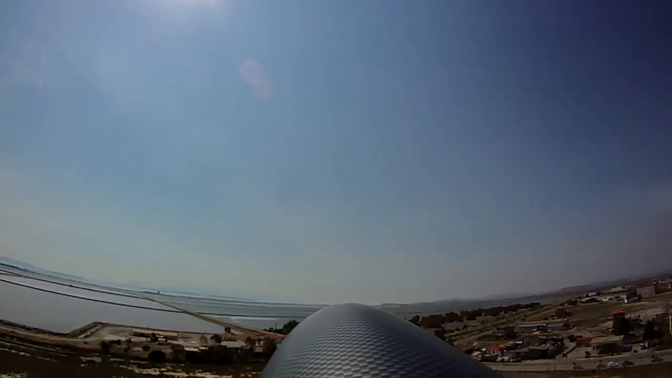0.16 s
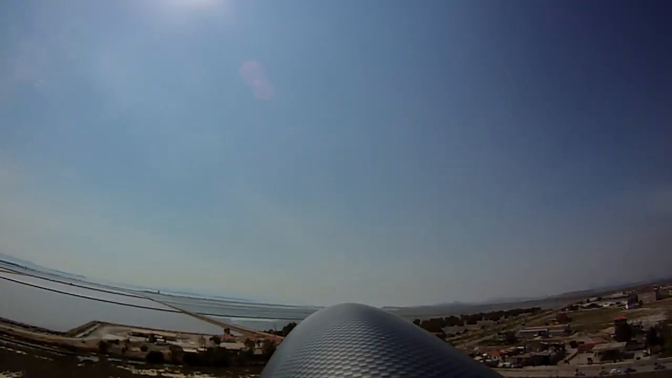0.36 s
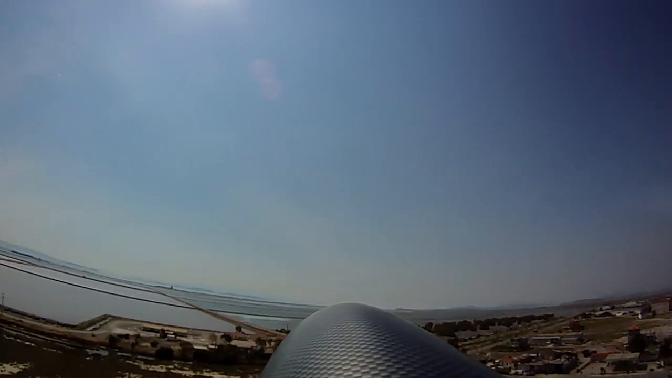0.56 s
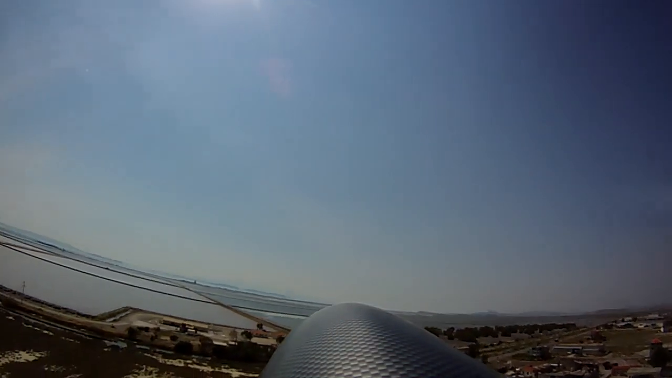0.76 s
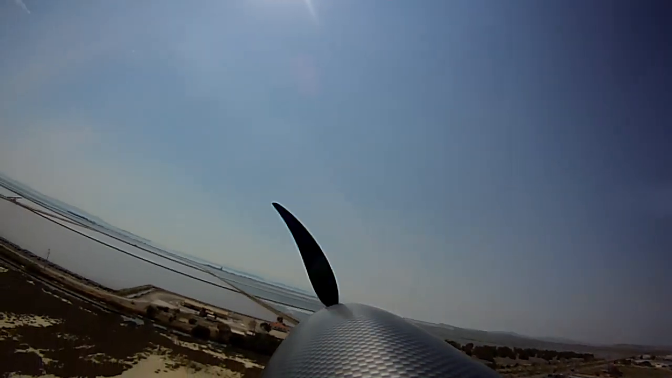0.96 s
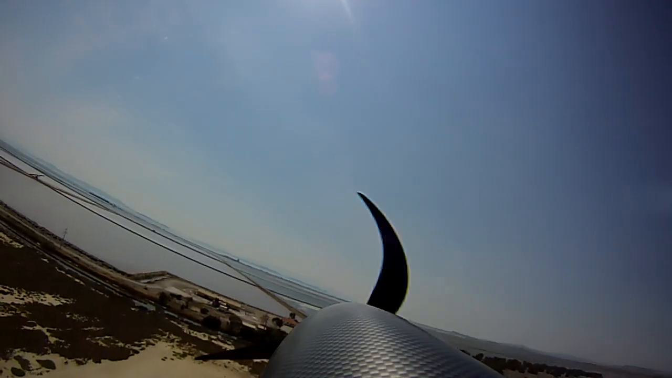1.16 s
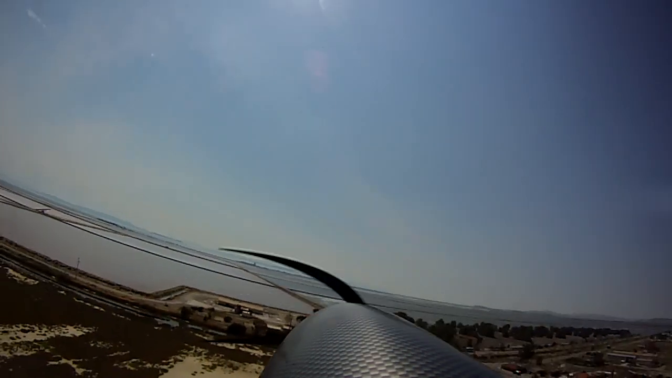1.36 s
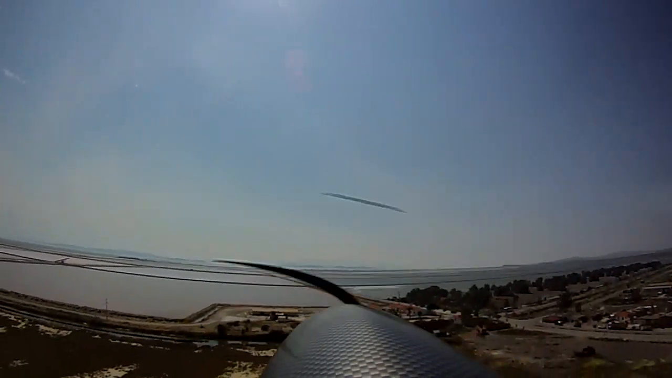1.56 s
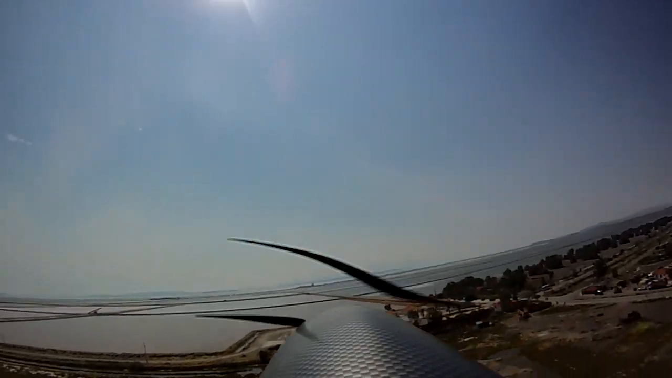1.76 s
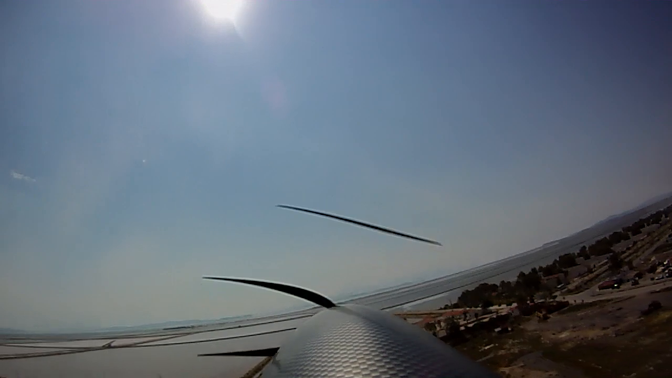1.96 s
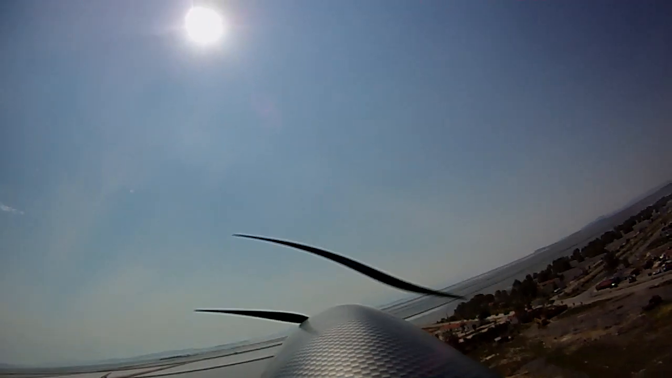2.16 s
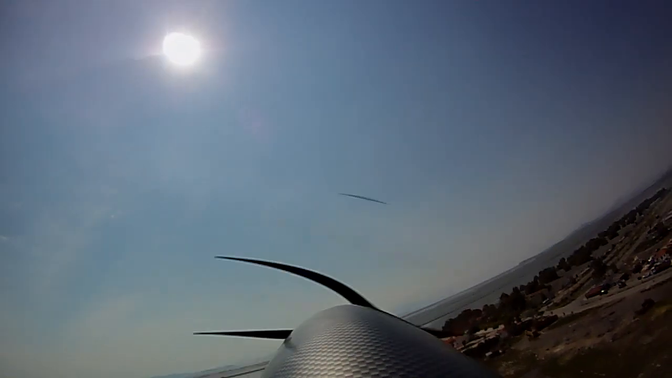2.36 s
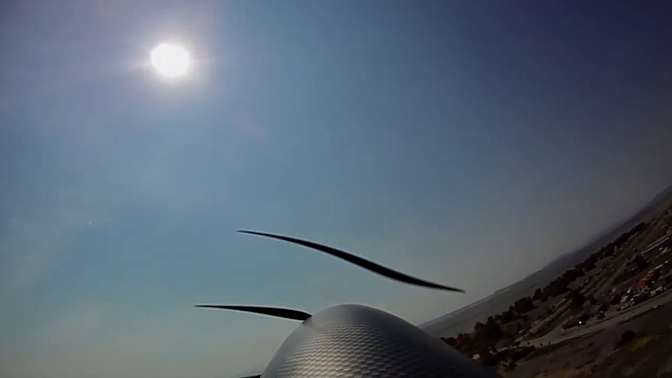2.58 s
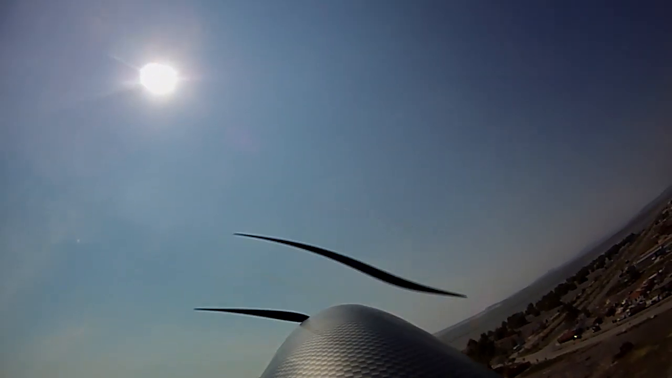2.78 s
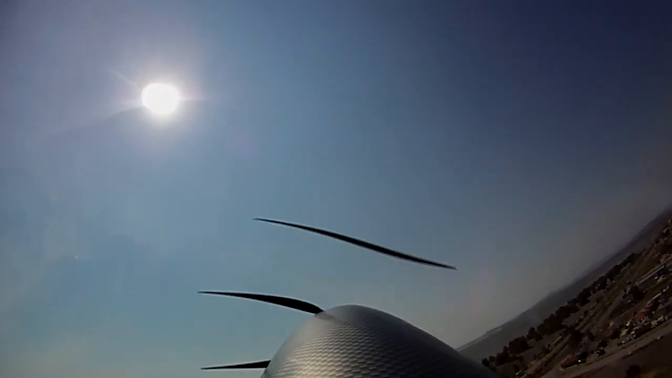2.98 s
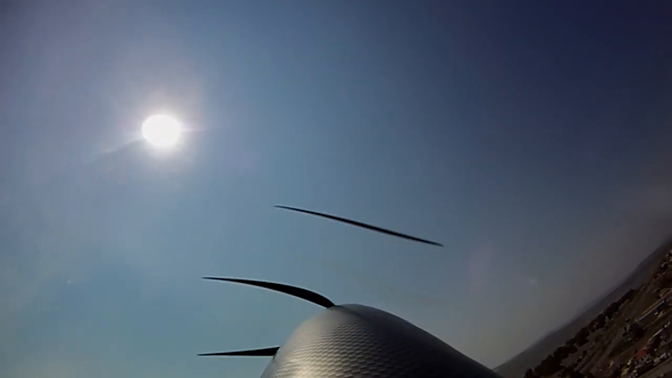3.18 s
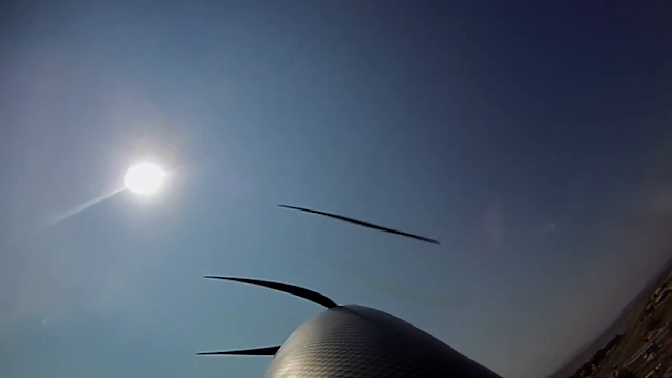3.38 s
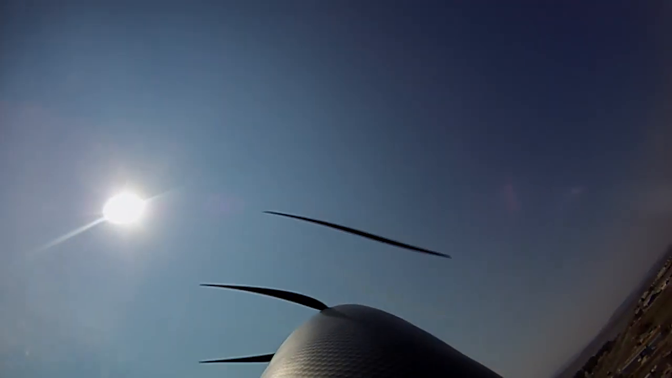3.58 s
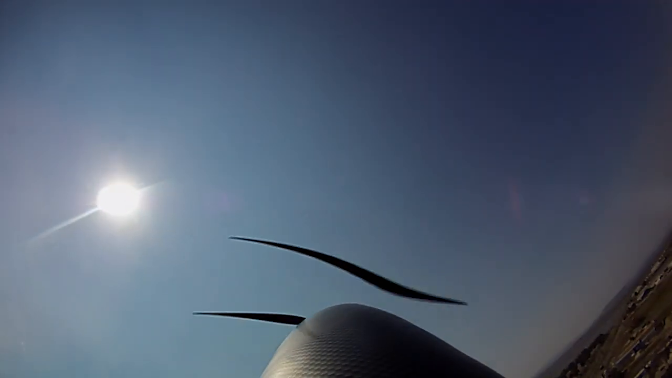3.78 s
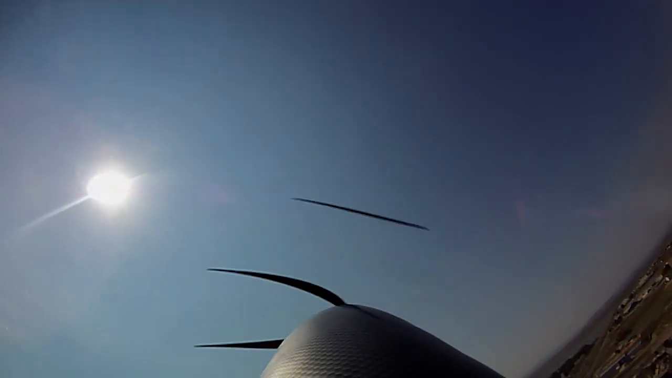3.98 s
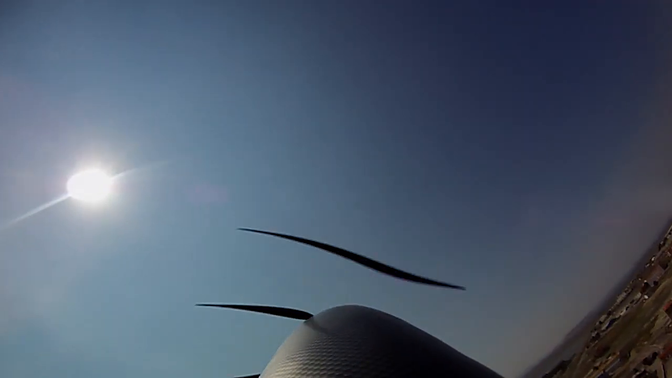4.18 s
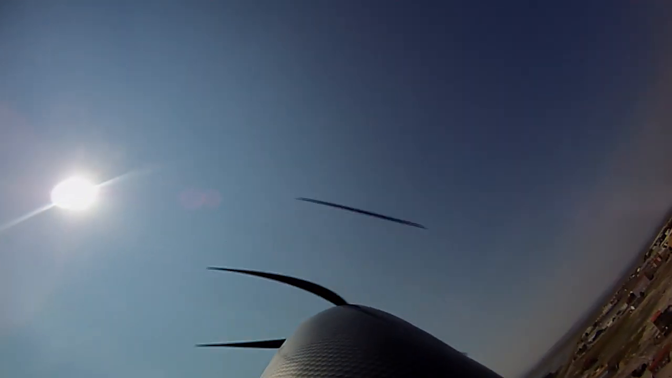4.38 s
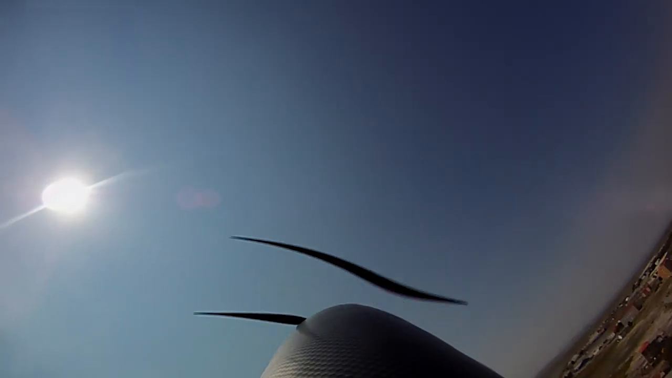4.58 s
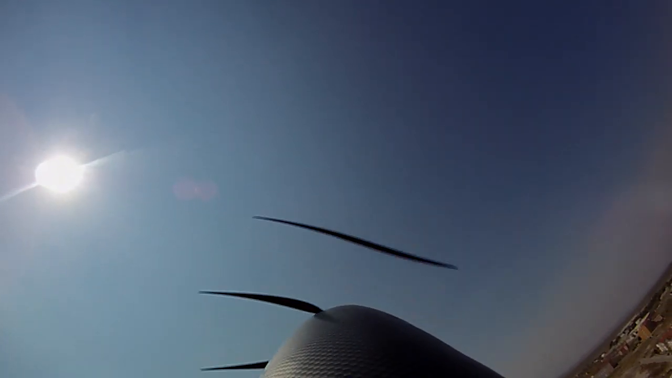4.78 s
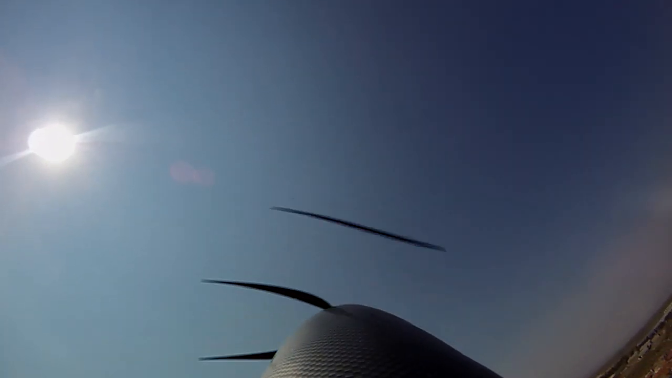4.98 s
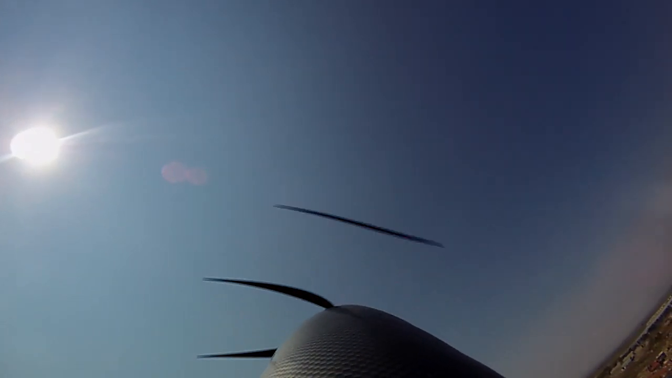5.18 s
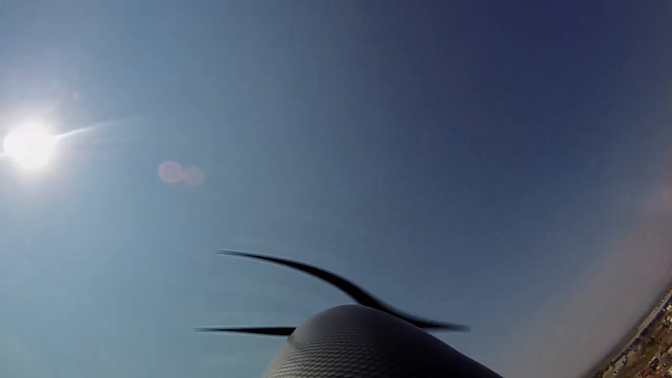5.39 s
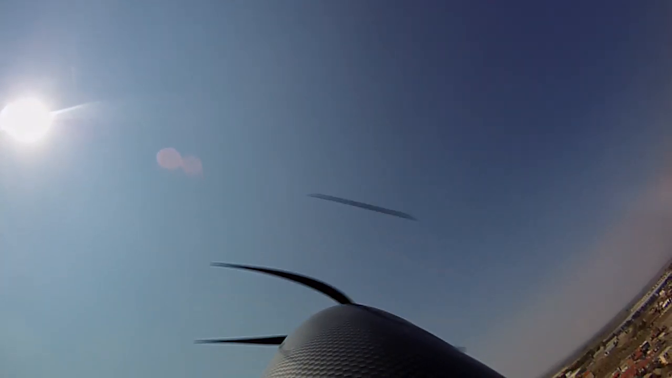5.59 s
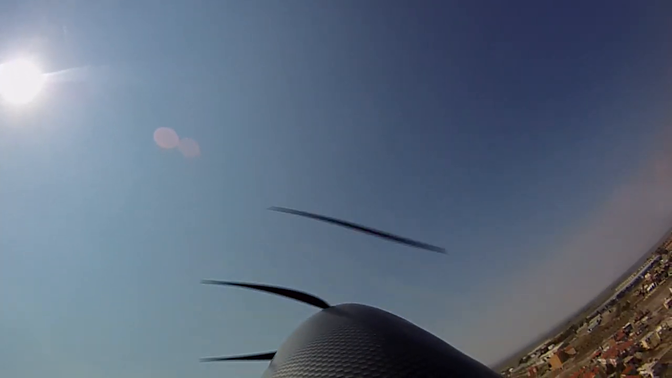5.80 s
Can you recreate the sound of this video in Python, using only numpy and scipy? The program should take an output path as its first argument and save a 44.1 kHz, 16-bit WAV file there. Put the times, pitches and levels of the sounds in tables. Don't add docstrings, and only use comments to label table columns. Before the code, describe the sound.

The microphone sits on a small model glider, right behind its folding propeller, high in open air. For the first second there is only quiet gliding: soft low buffeting, a thin hiss over the skin and a faint hollow hum that puffs early and again near 0.95 s. Tiny dry ticks appear from about 0.75 s, with a click and low knock at 1.0 s as the blades unfold. At 1.2 s a brushless motor starts, its whine sweeping rapidly upward and vanishing by about 1.6 s. Turbulent slipstream then swells abruptly, far louder, peaking near 1.85 s with hard, clipped slaps. It continues to 5.8 s as uneven, bassy pounding and rumble, with short dips, crackling bursts and airframe lurches, densest from 2 to 4 s. A faint, low, slightly wavering shaft drone lies beneath, and the recording ends still in the blast.

```python
import sys
import numpy as np
from scipy import signal
from scipy.fft import rfft, irfft, next_fast_len
from scipy.io import wavfile
from scipy.ndimage import uniform_filter1d

SR = 44100
rng = np.random.default_rng(int(sys.argv[2]) if len(sys.argv) > 2 else 0)


def volts(x):
    e = np.asarray(x, float) / 20
    return 10 ** e


def output_pcm(signal):
    pcm = np.clip(np.atleast_2d(signal).T, -1, 1) * 32767
    wavfile.write(sys.argv[1], SR, np.round(pcm).astype(np.int16))


N = 257544
T = np.arange(N) / SR

# time in seconds, pressure level in dB.
WASH_CURVE = [(1.39, -41), (1.49, -23), (1.68, -15.5), (1.86, -10.5), (1.98, -15), (2.15, -11.5),
              (2.55, -15.5), (2.75, -17.5), (2.96, -15), (3.21, -13), (3.44, -13), (3.58, -15.5),
              (3.83, -16.5), (3.9, -12), (4.1, -16.5), (4.93, -15.5), (5.05, -20), (5.84, -17.5)]
# time in seconds, peak in dB, length in ms.
AIR_SLAPS = [(1.6821, 1.5, 1.6), (1.7802, 1.8, 3.1), (1.8544, 6.3, 2.2), (2.0924, -2.5, 2.4),
             (2.1337, -0.0, 6.1), (2.2468, 0, 1.4), (2.352, 1, 1.26), (2.4449, -3, 2.3), (2.89, -2.5, 0.95),
             (2.9412, -1.3, 3.3), (3.1324, -5, 3.3), (3.178, -4.5, 2.7), (3.2358, -1.8, 2.8),
             (3.3767, -0.5, 1.8), (3.4377, -2, 3.9), (3.519, -2.7, 5.6), (3.539, -2, 3.1),
             (3.6642, -7.7, 4), (3.736, -4, 4.4), (3.921, -6, 2.1), (3.9828, -1, 1.8), (4.0023, -2.5, 1.6),
             (4.3486, -5, 1.5), (4.4223, -4.5, 2.2), (4.5489, -2.5, 2.1), (4.5783, -4.5, 2.8),
             (4.7136, -2.5, 2.9), (4.852, 2, 2.1), (4.9661, 1, 1.4), (5.6952, -8, 4.5)]
# time in seconds, depth in dB.
STREAM_LULLS = [(2.22, 5.6), (2.5, 4.6), (2.916, 5.2), (3.25, 2.8), (3.49, 7.4), (3.83, 4.1), (4.04, 1),
                (4.67, 2.7), (5.16, 3), (5.268, 6.6)]
# time in seconds, lift in dB.
EDDY_CRACKLES = [(2.375, 3), (2.528, 9), (2.557, 6.9), (2.624, 3.6), (2.703, 6.2), (2.958, 12),
                 (3.024, 8.4), (3.064, 4), (3.57, 5.9), (3.697, 5.7), (3.747, 3.2), (3.875, 3.4), (4.25, 4),
                 (4.31, 4.4), (4.46, 3.6), (5.378, 2)]
# time in seconds, lift in dB.
AIRFRAME_LURCHES = [(1.63, 0), (2.15, 15), (2.54, 15.5), (2.935, 13), (3.44, 15.5), (3.525, 5), (3.75, 13),
                    (3.99, 3), (4.1, 7), (4.63, 12), (4.988, 7), (5.11, 13), (5.22, 9), (5.32, 2)]
# frequency in Hz, level in dB per Hz.
WASH_SPECTRUM = [(8, -7), (30, 0), (100, -2.5), (220, -9), (400, -9), (700, -18), (1300, -22),
                 (2200, -28.5), (4000, -35.5), (7500, -44), (11000, -57.5), (15500, -66)]
# frequency in Hz, level in dB per Hz.
RUMBLE_SPECTRUM = [(8, 3), (25, 4.5), (80, 4.5), (160, -7.5), (400, -47), (1500, -130)]

# time in seconds, commutation whine in Hz.
WHINE_RUNUP = [(1.19, 480), (1.23, 757), (1.28, 1290), (1.33, 2120), (1.38, 2933), (1.43, 3648),
               (1.48, 4537), (1.52, 5060), (1.57, 5450)]
WHINE_MULTIPLES = [.5, 1, 1.5, 2, 2.5, 3]
WHINE_LEVELS = [-2, 0, -18, -13, -24, -18]
# frequency in Hz, width in Hz, level in dB.
FUSELAGE_MODES = [(780, 110, -1), (1200, 160, 7), (1700, 120, -10), (2200, 160, -6), (2850, 200, -9),
                  (3250, 200, -2), (3620, 180, -1)]
# time in seconds, rotation in Hz, drone level in dB.
SHAFT_CURVE = [(1.45, 100, -34), (1.6, 132.7, -35), (2.0, 132.3, -23.5), (3.0, 132, -22.5),
               (4.0, 134.8, -22.5), (4.8, 133, -20), (5.84, 130.8, -34)]
# multiple of the rotation, level in dB.
SHAFT_ORDERS = [(1, -4), (2, -9), (3, -13)]

# time in seconds, strength of its hiss in dB.
GLIDE_CURVE = [(0, -45), (.1, -49.5), (.4, -55.5), (.68, -58), (.85, -56.5), (.9, -53.5), (1.0, -55),
               (1.1, -58.5), (1.2, -56.5)]
# time in seconds, hum in dB, length in seconds.
CAVITY_PUFFS = [
    (0.063, -49.5, 0.08),
    (0.243, -53, 0.077),
    (.95, -47, 0.058),
    (1.043, -47, 0.0082),
]
# frequency in Hz, level in dB per Hz.
GLIDE_BUFFET_SPECTRUM = [(8, -34), (30, -17), (60, -2), (110, -4.5), (220, -9), (350, -13.5), (550, -14),
                         (750, -23), (1000, -36), (1500, -35.5), (2500, -53), (6000, -110)]
# frequency in Hz, level in dB per Hz.
GLIDE_HISS_SPECTRUM = [(820, -27), (1400, -7), (1930, -5.5), (2360, -8), (3120, -7), (3310, -12.5),
                       (4080, -5.5), (4600, -14), (6280, -16), (6720, -27.5), (7880, -20.5), (8800, -38),
                       (10500, -35), (13600, -72), (22000, -120)]
# time in seconds, peak in dB, frequency in Hz, decay in ms.
BLADE_TICKS = [
    (.745, -47, 4500, .15),
    (.8885, -43, 7500, 0.13),
    (.94, -48, 4000, .2),
    (.985, -39, 1900, .25),
    (.99, -21.5, 190, 7.2),
    (.997, -35, 2300, 0.4),
]
# multiple of the supply pitch, level in dB.
CIRCUIT_ORDERS = [(4, -84), (5, -82)]


def columns(table):
    s, *cols = np.transpose(table)
    return [np.interp(T, s, c) for c in cols]


def unit(x):
    return x / np.sqrt(np.mean(x ** 2))


def even(x, s):
    size = int(s * SR)
    power = uniform_filter1d(uniform_filter1d(x ** 2, size), size)
    return x / np.sqrt(power + 1e-12)


def bumps(times, heights, length):
    return sum(h * np.exp(-((T - s) / w) ** 2) for s, h, w in np.broadcast(times, heights, length))


def ramp(s, length):
    return np.clip((T - s) / length, 0, 1)


def noise(spectrum):
    hz, db = np.transpose(spectrum)
    size = next_fast_len(N)
    f = np.arange(size // 2 + 1) * SR / size + 1
    gain = volts(np.interp(np.log(f), np.log(hz), db))
    return unit(irfft(rfft(rng.standard_normal(size)) * gain, size)[:N])


def walk(rate):
    k = int(SR / rate)
    held = np.repeat(rng.standard_normal(N // k + 1), k)
    return unit(uniform_filter1d(uniform_filter1d(held, k), k)[:N])


def ring(x, hz, width):
    return signal.lfilter(*signal.iirpeak(hz, hz / width, SR), x)


def tones(hz, orders):
    turn = 2 * np.pi * np.cumsum(hz) / SR
    return sum(volts(db) * np.sqrt(2) * np.sin(k * turn + k * k) for k, db in orders)


def highpass(x, order, hz):
    return signal.sosfilt(signal.butter(order, hz, "high", fs=SR, output="sos"), x)


def pressure(along, across, steady):
    p = (steady + along) ** 2 + across ** 2
    return unit(p - uniform_filter1d(p, SR // 8))


def eddy_speed(patchy, spectrum):
    return np.tanh(even(patchy * noise(spectrum), 0.049) / 3.55) * 3.57


def slap(along, stirred, fine_db):
    swirl_hz, wake_s, wake_lift = 123.6, .014, 0.37
    for s, peak_db, ms in AIR_SLAPS:
        strength = volts((peak_db - np.interp(s, T, fine_db) - 18.0) / 2)
        near = slice(int((s - .02) * SR), int((s + 0.032) * SR))
        t = T[near] - s
        length = max(ms, 1)
        fall = np.where(t > 0, t * 600 / length, (t * 1600 / length) ** 2)
        passing = strength * np.exp(-fall)
        along[near] *= 1 + wake_lift * (t > 0) * np.exp(-(t / wake_s) ** 2)
        along[near] *= 1 - np.minimum(passing, 1)
        along[near] += 1.474 * passing * np.cos(2 * np.pi * swirl_hz * t)
        stirred[near] += 0.29 * passing


def slipstream():
    level_db = columns(WASH_CURVE)[0] - bumps(*np.transpose(STREAM_LULLS), 0.011)
    fine_db = -34 + 0.41 * (level_db + 14) - 9.5 * (1 - ramp(1.41, 0.23))
    fine_db = fine_db + bumps(*np.transpose(EDDY_CRACKLES), 0.0046)
    rumble_db = -24.5 + 0.36 * (level_db + 16) + bumps(*np.transpose(AIRFRAME_LURCHES), 0.042)

    patchy = volts(0.44 * walk(5) + 1.4 * walk(45))
    coarse = [(hz, db - 60 * (hz > 1000)) for hz, db in WASH_SPECTRUM]
    fine = [(hz, db - 60 * (hz < 1000)) for hz, db in WASH_SPECTRUM]
    along = eddy_speed(patchy, coarse)
    sideways = eddy_speed(patchy, coarse)
    upward = eddy_speed(patchy, coarse)
    stirred = np.ones(N)
    slap(along, stirred, fine_db)
    across = 0.71 * np.hypot(sideways, upward)
    coarse_p = even(pressure(along, across, steady=0.77), 0.16)

    speed = np.hypot(0.91 + along, across)
    riding = (speed ** 1.11 + 0.078) * noise(fine)
    flicker = volts(0.45 * walk(27) + 0.89 * walk(120))
    fine_p = even(riding * stirred * flicker, 0.085)
    finest = highpass(fine_p, 2, 5000)
    fine_p = fine_p - finest * np.clip((1.56 - T) / 1.1, 0, 1)
    fine_p = fine_p + 0.37 * highpass(fine_p, 4, 12500)

    port = 1.023 * coarse_p + .5 * ring(coarse_p, 429, 213)
    fade_in = ramp(1.27, 0.037) ** 2
    wash = volts(level_db + 1.04) * port + volts(fine_db + 3.5) * fine_p
    return fade_in * (wash + volts(rumble_db - 4.5) * noise(RUMBLE_SPECTRUM))


def housing(air):
    air = air - 0.33 * ring(air, 1040, 250)
    return air + 1.78 * ring(air, 1154, 105)


def motor():
    start_s, smooth_s = 1.205, 1.358
    grip, smooth = ramp(start_s, .02), ramp(smooth_s, .02)
    cogging_db, smooth_db = -39.5, -57
    air_cogging_db, air_smooth_db = -72, -47.5
    body_db = cogging_db - 25 * (T - start_s) - 28 * (1 - grip)
    body_db = body_db + smooth * (smooth_db - cogging_db - 70 * (T - smooth_s))
    air_db = air_cogging_db - 12 * (1 - grip)
    air_db = air_db + smooth * (air_smooth_db - air_cogging_db - 58 * (T - smooth_s))

    starting = (T > 1.19) * (T < 1.6)
    whine_hz = uniform_filter1d(columns(WHINE_RUNUP)[0], size=600) * (1 + 0.0041 * walk(200))
    partials = tones(whine_hz, zip(WHINE_MULTIPLES, WHINE_LEVELS))
    whine = volts(body_db + 2.6 * walk(220)) * starting * partials
    body = sum(volts(db) * ring(ring(whine, hz, width), hz, width) for hz, width, db in FUSELAGE_MODES)

    airborne = volts(air_db + 1.5 * walk(80)) * starting * tones(whine_hz, [(1, 0)])
    cowl = ring(ring(airborne, 3500, 300), 3500, 300)
    airborne = airborne + volts(5) * cowl

    shaft_hz, drone_db = columns(SHAFT_CURVE)
    orders = tones(shaft_hz * (1 + 0.0123 * walk(12)), SHAFT_ORDERS)
    drone = volts(drone_db - 0.5 + 2.9 * walk(14)) * (T > 1.45) * orders
    return volts(12) * body + airborne + drone


def glide():
    flow_db = columns(GLIDE_CURVE)[0]
    buffet_db = -27.5 + 0.49 * (flow_db + 52.5)
    hiss_db = flow_db + 2.5
    hum_db = -60
    s, db, length = np.transpose(CAVITY_PUFFS)
    cavity_db = hum_db + bumps(s, db - hum_db, length)

    gust = volts(1.7 * walk(26.14))
    buffet = pressure(gust * noise(GLIDE_BUFFET_SPECTRUM), 0., steady=4.8)
    sway = noise([(8, -24), (25, -4), (40, 0), (90, -30), (400, -130)])
    hiss = even(volts(1.5 * walk(45)) * noise(GLIDE_HISS_SPECTRUM), 0.1)
    cavity = unit(ring(ring(rng.standard_normal(N), 1170, 200), 1170, 200))
    return volts(buffet_db) * (buffet + 0.75 * sway) + volts(hiss_db) * hiss + volts(cavity_db + 6) * cavity


def ticks():
    out = np.zeros(N)
    for s, peak_db, hz, ms in BLADE_TICKS:
        decay = np.exp(-((T - s) * 1000 / max(ms, .05)) ** 2)
        out += volts(peak_db) * decay * np.sin(2 * np.pi * hz * (T - s))
    return out


def tips():
    hiss = noise([(3000, -30), (6500, 0), (10000, 0), (13500, -9), (16000, -20)])
    return volts(-68) * ramp(1.31, .07) * hiss


def circuit():
    supply_hz = 2712 * (1 + .003 * walk(8) + .0015 * walk(90))
    return tones(supply_hz, CIRCUIT_ORDERS) + volts(-72.5) * rng.standard_normal(N)


def scene():
    return (housing(slipstream()) + motor() + glide() + ticks() + tips() + circuit())[None, :]


def top_cut(x):
    return signal.sosfilt(signal.butter(12, 15710, fs=SR, output="sos"), x)


def record(dry):
    x = highpass(dry, 1, 22)
    x = x / (1 + (x / 1.01) ** 24) ** (1 / 24)
    x = signal.sosfiltfilt(signal.ellip(8, .1, 50, 15220, fs=SR, output="sos"), x)
    return top_cut(x)


dry = scene()
out = record(dry)
output_pcm(out)
```